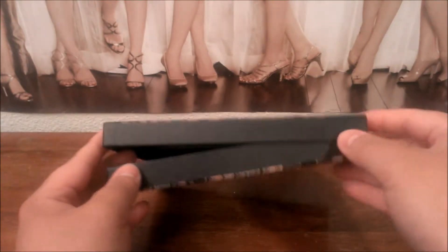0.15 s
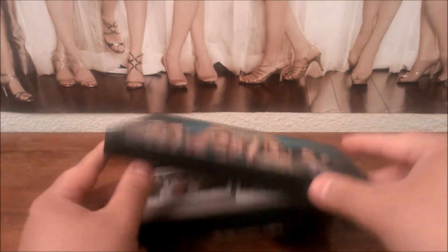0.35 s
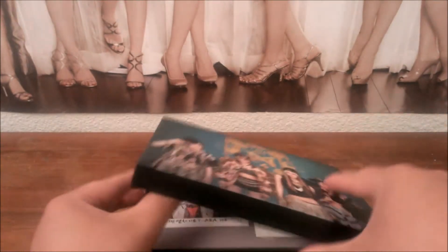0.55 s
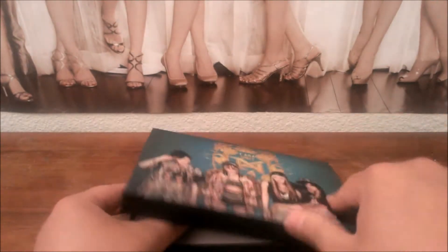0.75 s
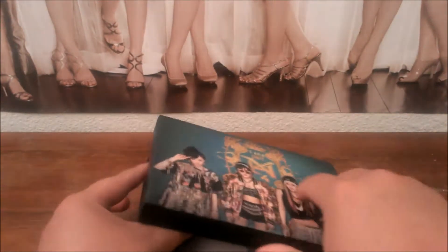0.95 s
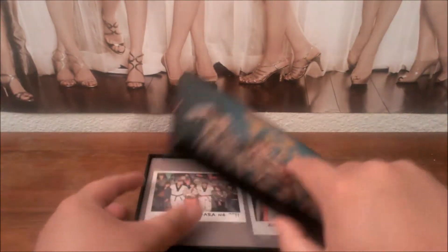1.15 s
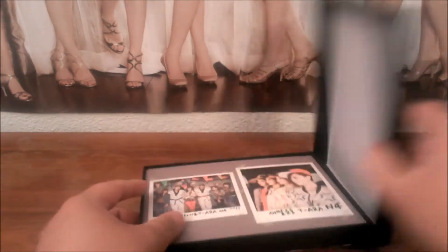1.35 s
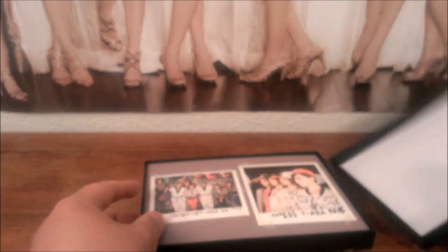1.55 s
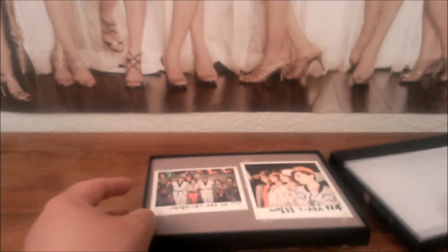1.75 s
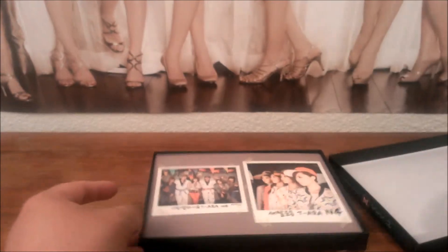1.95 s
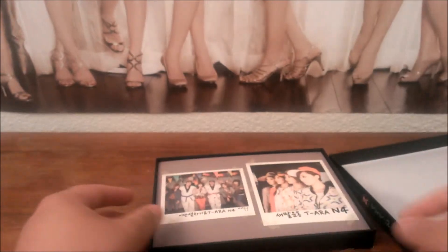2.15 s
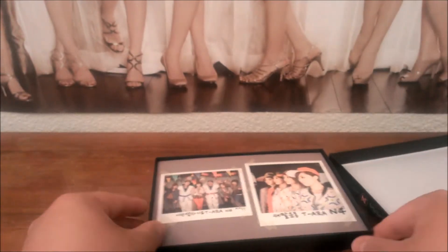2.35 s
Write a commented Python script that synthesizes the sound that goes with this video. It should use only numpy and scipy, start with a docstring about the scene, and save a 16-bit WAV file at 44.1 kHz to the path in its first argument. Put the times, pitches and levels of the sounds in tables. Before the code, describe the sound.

Close stereo pickup of a cardboard box on a wooden table in a small room; the lid rubs loose, the tray drops with a knock, then the lid is laid aside with scrapes, deep bumps and a final knock over soft hiss.

```python
"""A stiff cardboard box is opened on a wooden table in a small room, close to the microphones.
First the lid slides off as friction noise, then the tray drops and knocks the box's panels into resonance.
Later the lid is laid aside with short rasps of stick and slip, and a last strong knock follows.
Throughout, bumps excite the modes of the table top, whose boom is mostly in the right channel,
over a steady noise of rumble and hiss; noise-like echoes model the room."""
import sys
import numpy as np
from scipy import signal
from scipy.fft import rfft, irfft, next_fast_len
from scipy.io import wavfile

SR = 44100
rng = np.random.default_rng(int(sys.argv[2]) if len(sys.argv) > 2 else 0)


def wrap_up_sound(samples):
    """Save the sound to the file named by the first command line argument, as 16-bit audio."""
    columns = np.atleast_2d(samples).T
    # keep every value between -1 and 1, then stretch to whole-number steps
    tamed = np.clip(columns, -1, 1)
    steps = np.round(tamed * 32767).astype(np.int16)
    wavfile.write(sys.argv[1], SR, steps)


N = 109941
T = np.arange(N) / SR


def from_db(db):
    """Level law: decibels to amplitude gain."""
    return 10 ** (np.asarray(db) / 20)


def at_hz(points, hz, axis=1):
    """Logarithmic frequency scale: interpolate a column of a table on it."""
    p = np.array(points)
    return np.interp(np.log(np.maximum(hz, 1)), np.log(p[:, 0]), p[:, axis])


def colour(x, spectrum):
    """Linear filtering: multiply the Fourier transform by a spectral envelope."""
    hz = np.fft.rfftfreq(x.shape[-1], 1 / SR)
    return irfft(rfft(x) * from_db(at_hz(spectrum, hz)), x.shape[-1])


def rms_one(x):
    """Normalisation: divide by the standard deviation."""
    return x / x.std()


def ring(t, hz, t60):
    """Damped free vibration: one mode decays by 60 dB in t60 seconds."""
    return np.sin(2 * np.pi * hz * t) * np.exp(-np.log(1000) * t / t60)


def add(out, s, x):
    """Superposition: mix a sound in, starting at s seconds."""
    i = max(int(s * SR), 0)
    out[..., i:i + x.shape[-1]] += x[..., :N - i]


def widen(three, apart):
    """Partial coherence: one shared and two separate noises become a stereo pair."""
    return rms_one(three[0] + apart * three[1:])


def friction(per_s, size_db, spectrum, apart):
    """Stick-slip: fibres catch and let go in dense tiny clicks of uneven size."""
    shape = (3, N)
    happens = rng.random(shape) < per_s / SR
    strength = rng.standard_normal(shape)
    unevenness = from_db(size_db * np.minimum(rng.exponential(1, shape), 4))
    return widen(colour(happens * strength * unevenness, spectrum), apart)


# Spectrum of the steady room tone. Each row: frequency in Hz, relative level in dB.
ROOM_TONE = [(25, 11), (45, -12), (80, 15), (105, 6.5), (160, 9.5), (250, 1.5), (600, -7), (1300, -11),
             (1900, -9), (2500, -12), (4500, -10.5), (7500, -15), (11000, -25.5)]
ROOM_TONE_DB, TONE_APART = -60.5, 2.35


def room_tone():
    """Stationary random noise: a spectral envelope gives low rumble and hiss."""
    tone = widen(colour(rng.standard_normal((3, N)), ROOM_TONE), TONE_APART)
    return from_db(ROOM_TONE_DB) * tone


# Echoes of the room. Each row: frequency in Hz, relative echo level in dB, decay by 60 dB in seconds.
ROOM = [(127, -14.5, 0.083), (302, -8, 0.31), (550, -23, 0.12), (1600, -19.5, 0.093), (4000, -12, 0.24),
        (9000, -8.5, 0.14)]
ROOM_DELAY_S = 0.0081


def room(x):
    """Diffuse reverberation: convolve with noise that decays exponentially band by band."""
    t, response = T[:SR // 2], 0
    edges = np.geomspace(60, 12000, 9)  # eight bands, in Hz
    for low, high in zip(edges, edges[1:]):
        hz = np.sqrt(low * high)
        fade = (t > ROOM_DELAY_S) * np.exp(-np.log(1000) * t / at_hz(ROOM, hz, axis=2))
        noise = rng.standard_normal((2, len(t))) * fade
        band_pass = signal.butter(2, [low, high], "band", fs=SR, output="sos")
        band = signal.sosfilt(band_pass, noise)
        response = response + band * from_db(at_hz(ROOM, hz)) / np.linalg.norm(fade)
    return signal.fftconvolve(x, response, axes=1)[:, :N]


# Soft rubs of fingers along the board. Each row: middle in seconds, level in dB,
# Gaussian half length (standard deviation) in seconds.
RUBS = [(0.479, -59, 0.01), (1.187, -61.5, 0.029), (1.331, -63, .03), (1.458, -57, 0.037),
        (1.918, -56.5, 0.064), (2.295, -64, 0.24)]
# Spectrum of the rubs. Each row: frequency in Hz, relative level in dB.
RUB = [(200, -22.5), (1000, -8.5), (1700, 0), (1890, 10.5), (2100, 3), (2600, 1), (4000, 2), (5400, -1),
       (7000, -11.5), (11000, -30.5)]


def rubs():
    """Dense friction: soft, dull noise swells and fades under Gaussian envelopes."""
    level = sum(from_db(db) * np.exp(-.5 * ((T - s) / half) ** 2) for s, db, half in RUBS)
    return level * friction(12000, size_db=0.5, spectrum=RUB, apart=0.27)


# Course of cardboard and fingers sliding. Each row: time in seconds, level in dB before flicker.
SLIDING = [(0, -60.5), (.075, -52), (.12, -55.5), (.17, -101), (.23, -72), (.28, -62), (.47, -59),
           (.56, -58.5), (.76, -61.5), (.87, -53), (1.03, -63.5), (1.17, -59.5), (1.37, -60.5), (1.47, -58),
           (1.535, -49), (1.59, -84), (1.78, -63), (1.91, -55.5), (2.03, -57.5), (2.15, -57), (2.3, -80.5),
           (2.49, -69)]
# Spectrum of the sliding. Each row: frequency in Hz, relative level in dB.
SLIDE = [(40, -29), (170, 9.5), (400, 0.5), (1000, 0.5), (2000, -5), (3500, -7), (5200, -6.5), (7000, -5.5),
         (11000, -9.5)]
SLIDE_GRAINS_PER_S, SLIDE_FLICKER_DB, SLIDE_APART = 5000, 2, 1


def sliding():
    """Sliding friction: cardboard on cardboard and skin gives a quiet, uneven hiss."""
    slow = signal.butter(2, 30, fs=SR, output="sos")  # low-pass at 30 Hz
    flicker = rms_one(signal.sosfilt(slow, rng.standard_normal(N)))
    level = np.interp(T, *np.transpose(SLIDING)) + SLIDE_FLICKER_DB * flicker
    return from_db(level) * friction(SLIDE_GRAINS_PER_S, size_db=1.5, spectrum=SLIDE, apart=SLIDE_APART)


# A cardboard edge catches and rasps. Each row: start in seconds, level in dB, hold in seconds,
# exponential decay time in seconds.
RASPS = [(1.748, -53.5, 0.0026, 0.0056), (1.772, -58.5, .015, .008), (1.858, -28.5, 0.0056, .009),
         (1.931, -34.5, 0.001, 0.0023), (1.936, -28.5, 0.0012, .006), (2.091, -54, 0.0069, 0.0088),
         (2.399, -55.5, 0.018, 0.015)]
# Spectrum of the rasps. Each row: frequency in Hz, relative level in dB.
RASP = [(200, 4.5), (800, -9.5), (1100, -2.5), (1550, -9), (2000, 0.5), (2400, -2.5), (2900, 5.5),
        (3550, -3.5), (4200, 0), (4800, -3.5), (5400, 0), (7000, -6.5), (11000, -17)]
RASP_GRAINS_PER_S, RASP_APART = 7700, 0.68


def rasps():
    """Stick-slip in a short burst: an edge scrapes with sudden start, short hold and quick decay."""
    level = sum(from_db(db) * (T >= s) * np.exp(-np.maximum(T - s - hold, 0) / decay)
                for s, db, hold, decay in RASPS)
    return level * friction(RASP_GRAINS_PER_S, size_db=4.5, spectrum=RASP, apart=RASP_APART)


# Spectrum of the scuffs. Each row: frequency in Hz, relative level in dB.
SCUFF = [(120, -33), (230, -14), (330, 13), (450, -3), (700, 6.5), (1100, -8), (2000, -14.5), (6000, -28)]
# Bumps on the table, shared with bumps() below. Each row: start in seconds, boom level in dB,
# contact in seconds, extra level of the deepest mode in dB, scuff level in dB.
BUMPS = [(0.024, -47, 0.0028, -8, -54), (0.082, -41.5, 0.0037, -7.5, -59.5),
         (0.259, -44.5, 0.0026, -5.5, -53), (0.337, -53, 0.0014, 0, -62), (0.418, -52.5, 0.0033, -1.5, -60),
         (0.531, -49, 0.0012, -3, -49), (0.595, -25, 0.0011, 10, -39.5), (0.658, -33.5, 0.0034, -13.5, -43),
         (0.807, -34.5, 0.0016, 8, -31), (0.926, -45.5, 0.0026, 7.5, -80), (1.091, -38.5, 0.0027, 0, -48),
         (1.208, -40, 0.004, -3, -49.5), (1.275, -40.5, 0.0036, 6.5, -44), (1.327, -34, 0.0039, -16.5, -62),
         (1.523, -26.5, 0.003, -17, -58.5), (1.79, -37, 0.0011, -15, -46), (1.815, -27.5, 0.0016, -8, -42),
         (1.866, -16, 0.0033, -1, -41), (1.89, -23, .004, -27, -64), (1.96, -22.5, .003, 0, -38),
         (2.068, -23.5, 0.0027, 1.5, -35.5), (2.163, -17, 0.0053, 0.5, -69), (2.42, -52.5, .003, 0, -68),
         (2.458, -49, .003, -12, -80)]
SCUFF_DECAY_S, SCUFF_GRAINS_PER_S = 0.019, 2100


def scuffs():
    """Transient friction: with every bump the box shifts a little in a dull, brief scuff."""
    level = sum(from_db(db) * (T >= s) * np.exp(-np.maximum(T - s, 0) / SCUFF_DECAY_S)
                for s, _, _, _, db in BUMPS)
    return level * friction(SCUFF_GRAINS_PER_S, size_db=2.0, spectrum=SCUFF, apart=0.13)


# Modes of the table. Each row: frequency in Hz, relative level in dB, decay by 60 dB in seconds.
TABLE = [(78.9, -14, 0.29), (129.6, -9.5, 0.11), (161.55, 4, 0.12), (186.4, 3.5, 0.062), (209, -2, 0.07),
         (320, -10.5, 0.41)]
LOW_CUT_HZ = 56


def bumps():
    """Modal excitation by a half-sine force: the table booms, duller for longer contacts."""
    out, t = np.zeros(N), T[:SR // 2]
    for s, db, contact_s, deep_db, _ in BUMPS:
        push = np.sin(np.pi * np.minimum(t / contact_s, 1))
        boom = 0
        for k, (hz, level, t60) in enumerate(TABLE):
            sign = (-1) ** min(k, 3)
            boom = boom + sign * from_db(level + deep_db * (k == 0)) * ring(t, hz, t60)
        add(out, s, from_db(db) * signal.fftconvolve(push / push.sum(), boom)[:len(t)])
    return signal.sosfilt(signal.butter(2, LOW_CUT_HZ, "high", fs=SR, output="sos"), out)


# Modes of the box panels. Each row: frequency in Hz, relative level in dB, decay by 60 dB in seconds.
BOX = [(490, -10, 0.03), (537, -5, 0.074), (642, -2.5, 0.088), (705, -8, 0.083), (860, -11, 0.081),
       (1010, 0, 0.044), (1440, -1, .035), (1538, -2, 0.019), (1965, -5.5, 0.0084), (2588, -7.5, 0.029),
       (3222, -29, 0.052), (4170, -17, 0.044), (5330, -12.5, 0.016), (6240, -8, 0.016)]
# The hollow of the box sings on after a knock. Each row: frequency in Hz, relative level in dB,
# decay by 60 dB in seconds.
HOLLOW = [(326, -37.5, 0.51), (337, -35, .55), (444, -31.5, .28), (532, -24, .15)]
# Spectrum of the crack. Each row: frequency in Hz, relative level in dB.
CRACK = [(40, -43), (100, -44), (280, 2.5), (700, 2.5), (1400, 7), (2500, -16), (3500, -16), (5200, -20.5),
         (7500, -29), (11000, -35.5)]
# Cardboard knocks. Each row: start in seconds, level in dB, hollow low end in dB, upper middle in dB,
# treble in dB, exponential decay of the crack in seconds.
KNOCKS = [(0.5331, -35.5, -8.5, -23, -8, 0.0062), (0.595, -14, -1, -3, 0, 0.0045),
          (0.6634, -46, 11, -5.5, -12, .005), (0.8087, -29, 4, 2, 3, .004),
          (1.086, -46, 5, -5.5, -10, 0.0059), (1.108, -51.5, 2, -16, -27, 0.021),
          (1.517, -39.5, 6, 4.5, -3, 0.0018), (1.814, -43, 4, -0.5, 10, 0.0093),
          (1.906, -42.5, -3, -9, -18, 0.024), (1.9685, -39, -6, 2, -3, 0.0026),
          (1.9797, -33.5, 2, -2, -5, 0.0042), (2.0685, -16.5, -7, -13, -10.5, 0.0039)]
CRACK_DB, CRACK_APART, CRACK_RISE_S = 4.5, 0.85, 0.000067
BOX_DB, MODE_SCATTER_DB = -4, 1
KNOCK_FOCUS_HZ = 996  # the knock's tone balance is 0 dB here
SLAP_HZ, SLAP_T60_S, SLAP_DB = 1060, 0.0046, 4  # the face that is hit flexes once or twice


def knocks():
    """Impact and modal superposition: a slap, a short crack, ringing panels and a faintly singing hollow."""
    out, t = np.zeros((2, N)), T[:SR // 2]
    hollow = sum(from_db(level) * ring(t, hz, t60) for hz, level, t60 in HOLLOW)
    slap = from_db(SLAP_DB) * ring(t, SLAP_HZ, SLAP_T60_S)
    for s, db, low_db, upper_db, treble_db, decay_s in KNOCKS:
        tone = [(650, low_db), (KNOCK_FOCUS_HZ, 0), (1500, upper_db), (2400, treble_db)]
        # each mode varies a little from knock to knock and between channels
        scatter = rng.normal(0, MODE_SCATTER_DB, (len(BOX), 2, 1))
        panels = 0
        for k, (hz, level, t60) in enumerate(BOX):
            gain = from_db(BOX_DB + level + scatter[k] + at_hz(tone, hz))
            panels = panels + (-1) ** (k // 2) * gain * ring(t, hz, t60)
        noise = widen(colour(rng.standard_normal((3, len(t))), CRACK), CRACK_APART)
        envelope = np.exp(-t / decay_s) * (1 - np.exp(-t / CRACK_RISE_S))
        crack = from_db(CRACK_DB) * colour(noise, tone) * envelope
        add(out, s, from_db(db) * (slap + panels + crack + from_db(low_db) * hollow))
    return out


def scene():
    """Superposition: direct sound of box, table and hands, its reverberation and the room tone."""
    direct = knocks() + bumps() + scuffs() + rasps() + sliding() + rubs()
    background = room_tone()
    return direct + room(direct) + background


# The microphone pair. Each row: frequency in Hz, left minus right level in dB,
# phase by which left leads in radians.
PORTS = [(60.3, -15, 0.17), (160.3, -20, 0.43), (268, -4.5, 2.38), (429, 1, 3.1), (626, 4, 4.17),
         (1020, 7, 3.87), (1590, 7, 4.61), (2800, 4, 4.74), (5200, 0, 5.7), (6340, 4.5, 8.85),
         (9500, 11, 7)]
CUTOFF_HZ = 10600


def record(dry):
    """Interchannel level and phase: bass leans right, the middle left; a low-pass cuts the top."""
    size = next_fast_len(N + SR // 4)
    hz = np.fft.rfftfreq(size, 1 / SR)
    gains = from_db(np.outer([.5, -.5], at_hz(PORTS, hz)))
    gains = gains / np.sqrt(np.mean(gains ** 2, axis=0))  # keep the mean power of the pair
    phases = np.outer([0, -1], at_hz(PORTS, hz, axis=2))
    heard = irfft(rfft(dry, size) * gains * np.exp(1j * phases), size)[:, :N]
    low_pass = signal.ellip(12, .2, 70, CUTOFF_HZ, fs=SR, output="sos")
    return signal.sosfilt(low_pass, heard)


dry = scene()
out = record(dry)
wrap_up_sound(out)
```